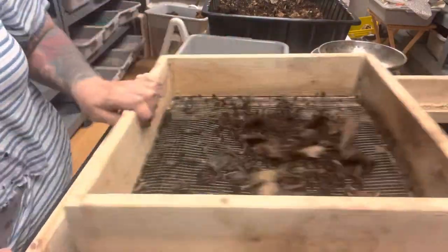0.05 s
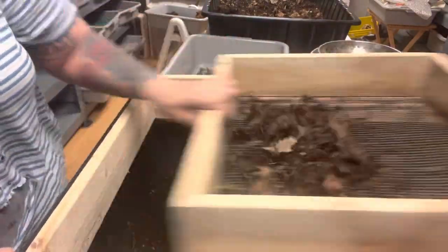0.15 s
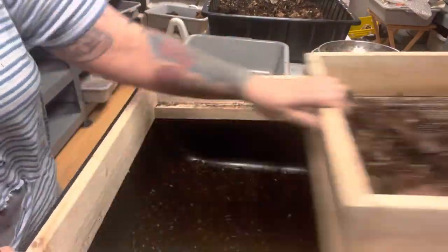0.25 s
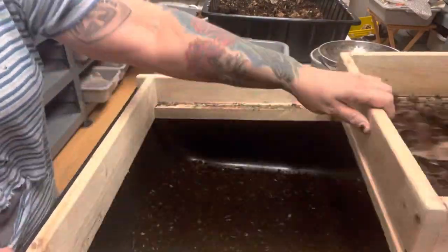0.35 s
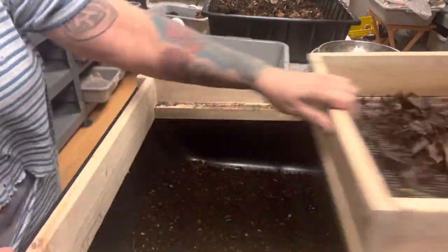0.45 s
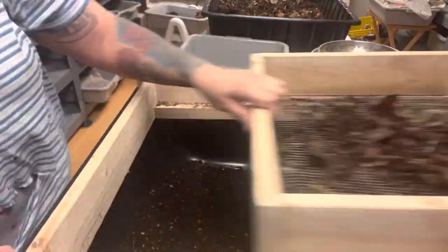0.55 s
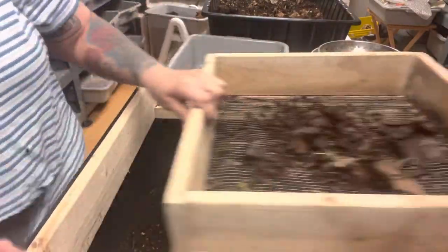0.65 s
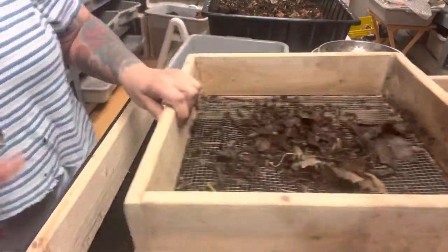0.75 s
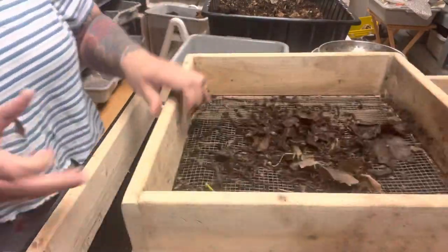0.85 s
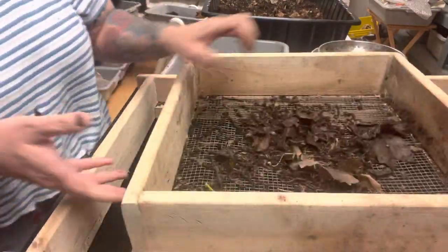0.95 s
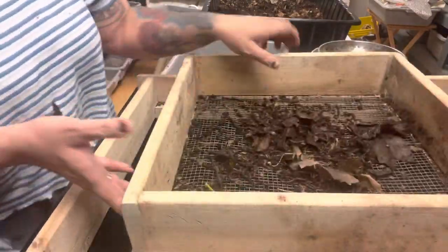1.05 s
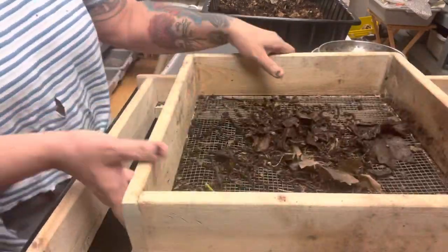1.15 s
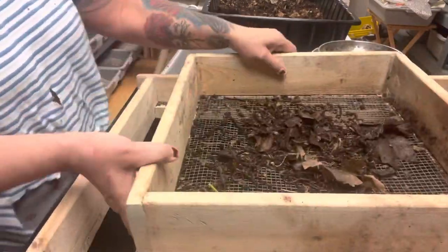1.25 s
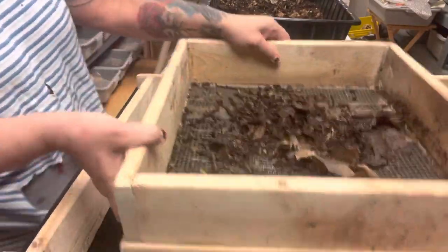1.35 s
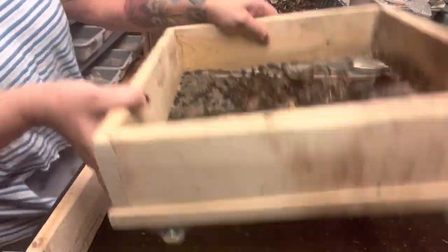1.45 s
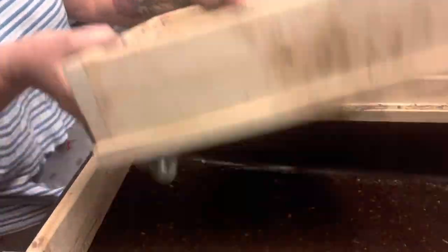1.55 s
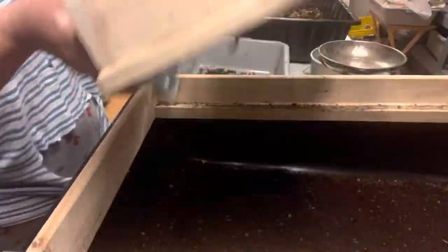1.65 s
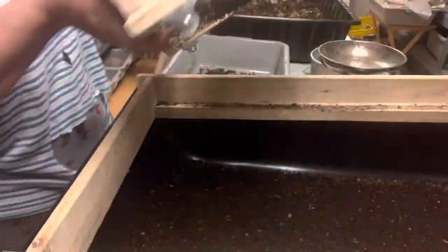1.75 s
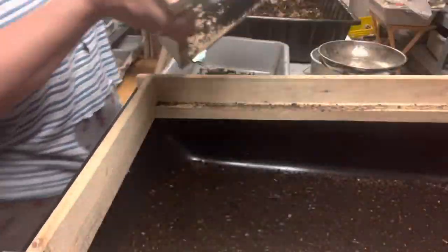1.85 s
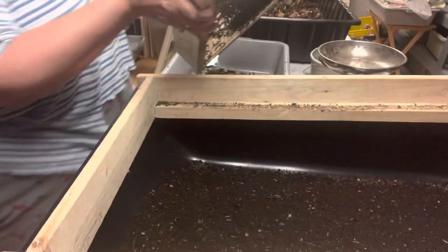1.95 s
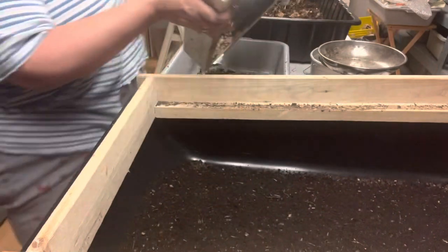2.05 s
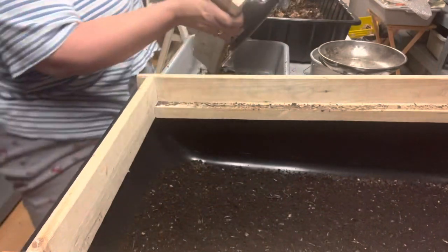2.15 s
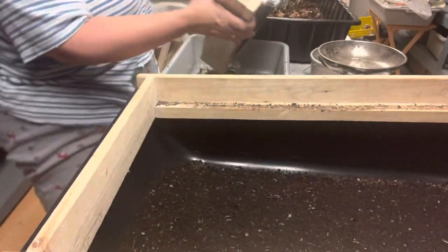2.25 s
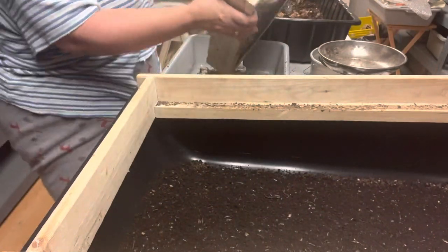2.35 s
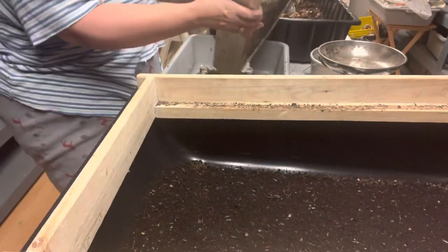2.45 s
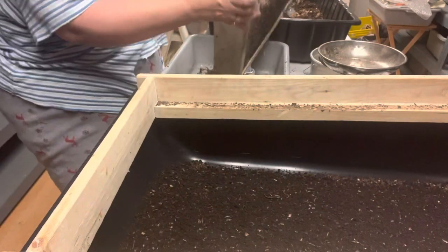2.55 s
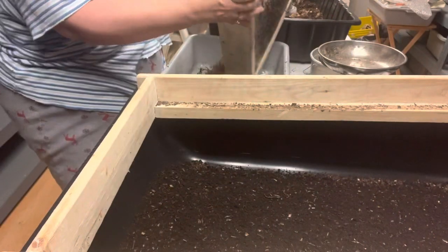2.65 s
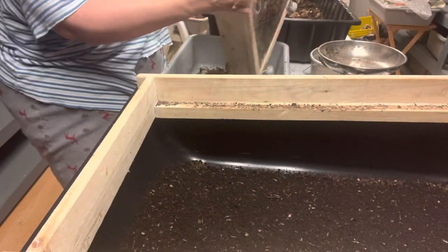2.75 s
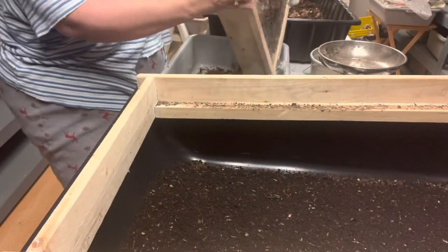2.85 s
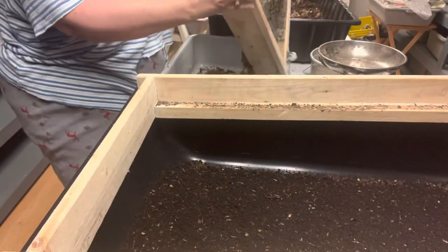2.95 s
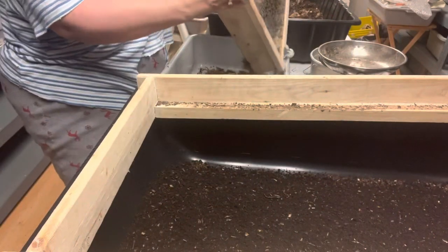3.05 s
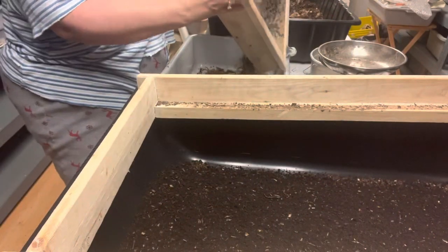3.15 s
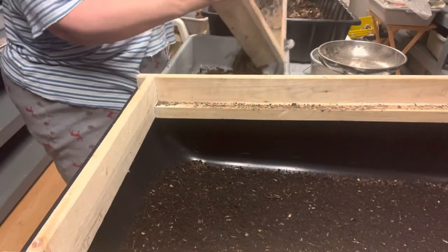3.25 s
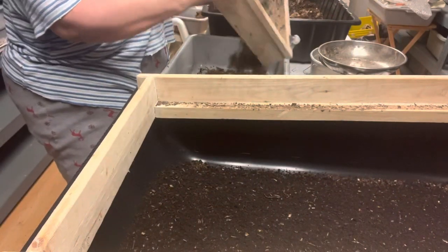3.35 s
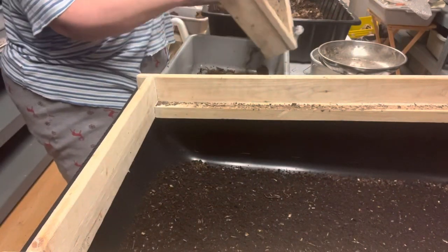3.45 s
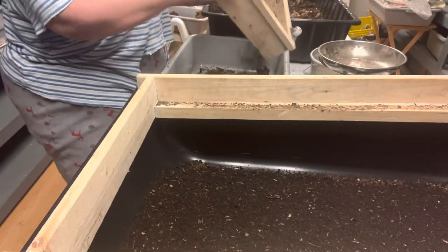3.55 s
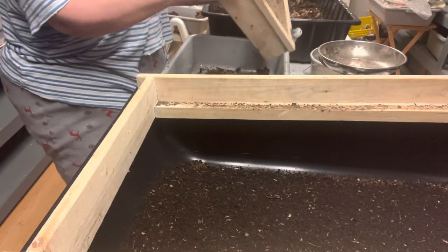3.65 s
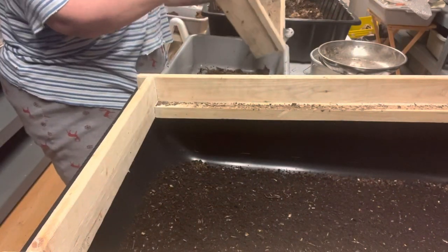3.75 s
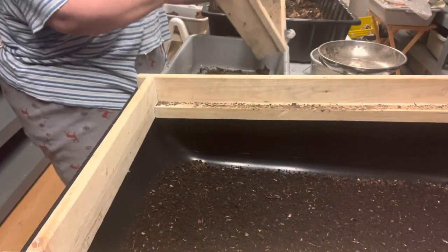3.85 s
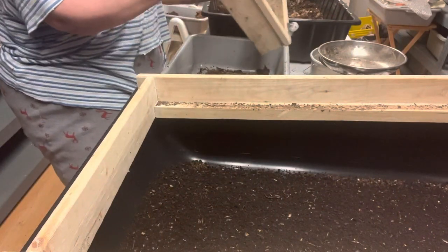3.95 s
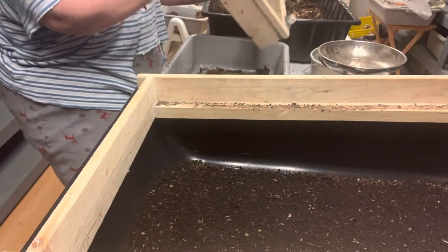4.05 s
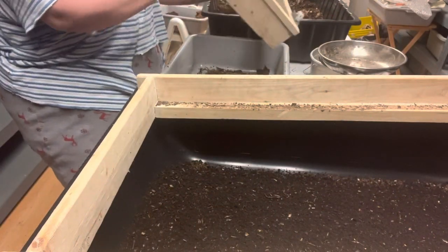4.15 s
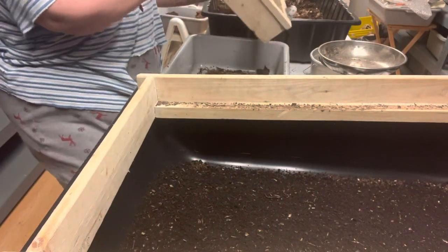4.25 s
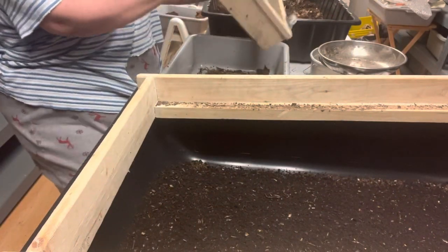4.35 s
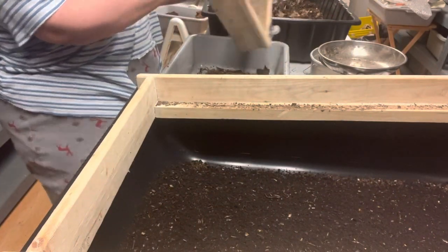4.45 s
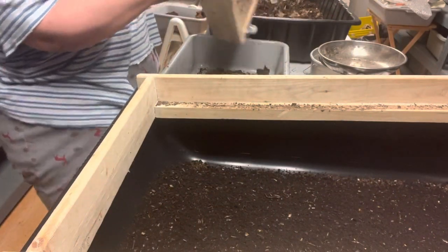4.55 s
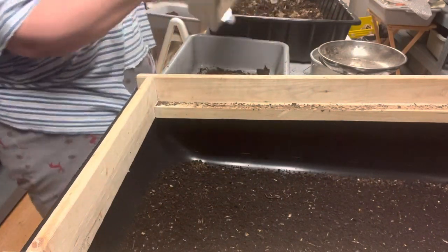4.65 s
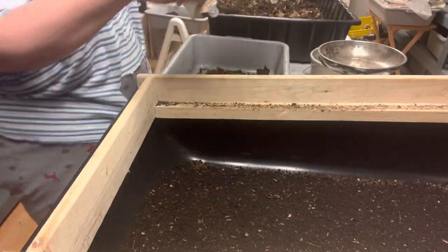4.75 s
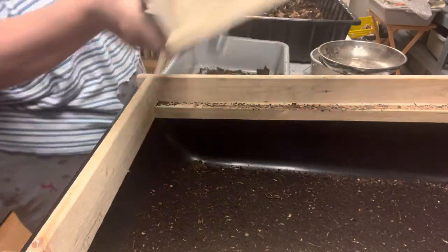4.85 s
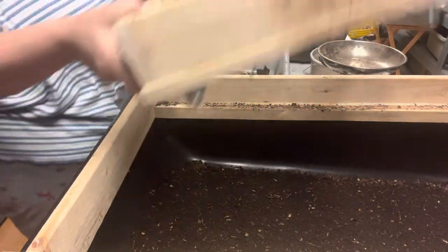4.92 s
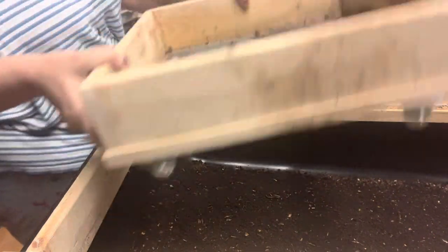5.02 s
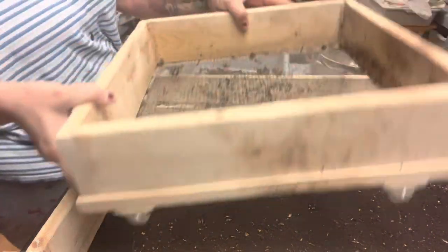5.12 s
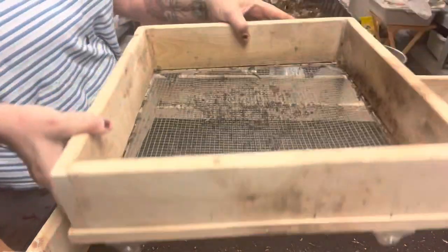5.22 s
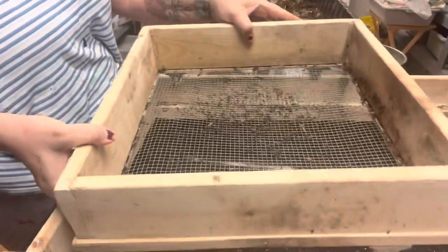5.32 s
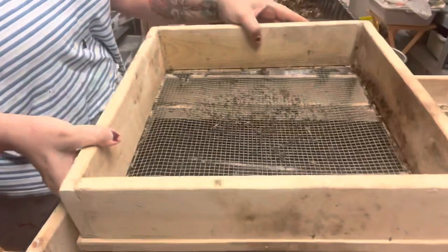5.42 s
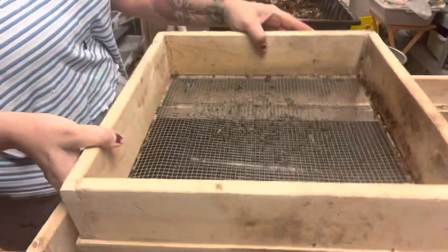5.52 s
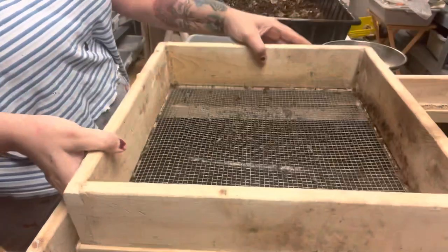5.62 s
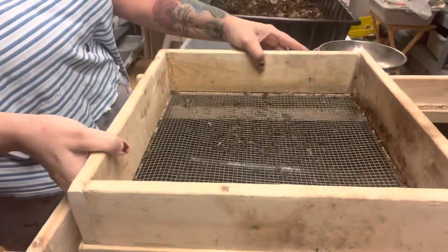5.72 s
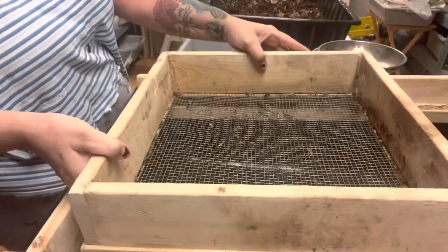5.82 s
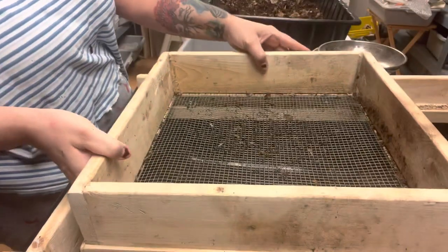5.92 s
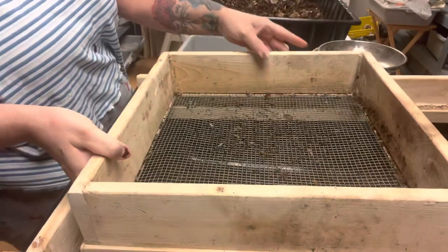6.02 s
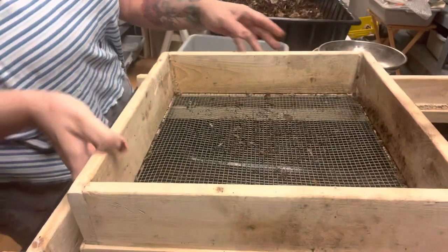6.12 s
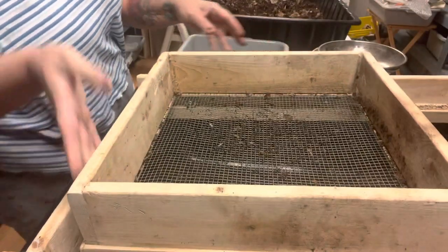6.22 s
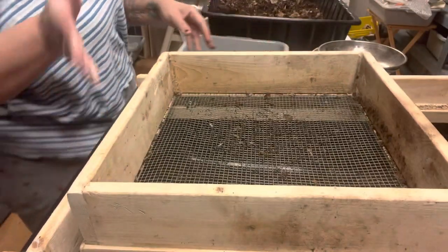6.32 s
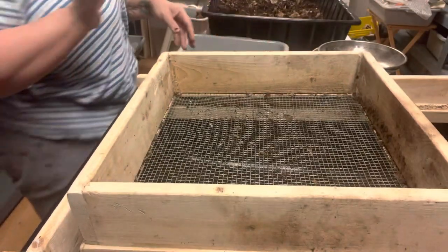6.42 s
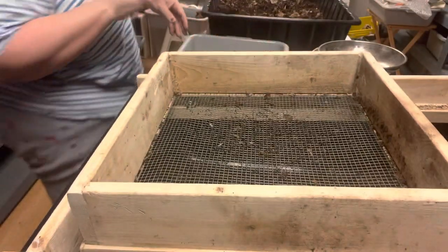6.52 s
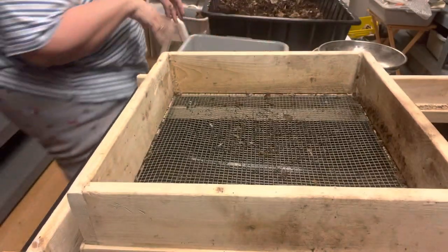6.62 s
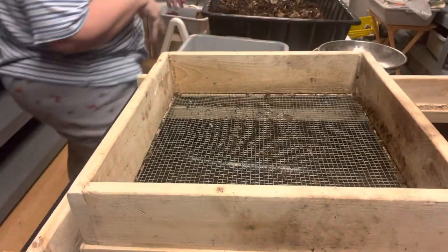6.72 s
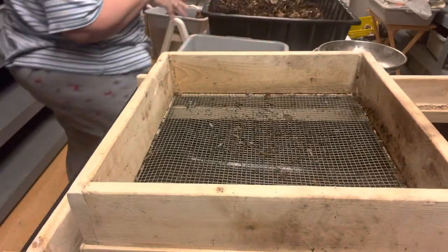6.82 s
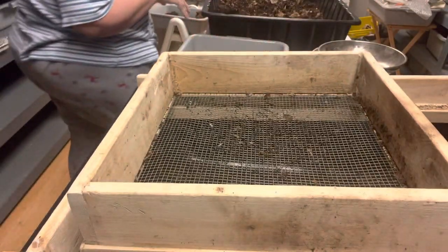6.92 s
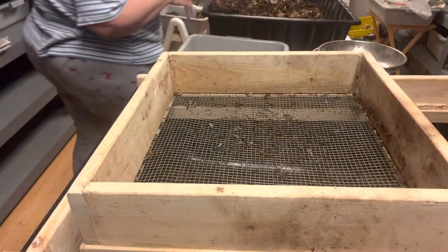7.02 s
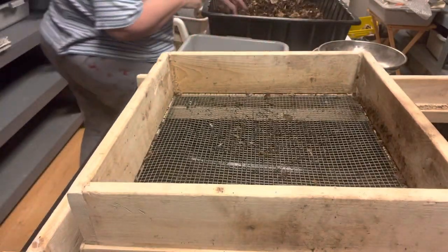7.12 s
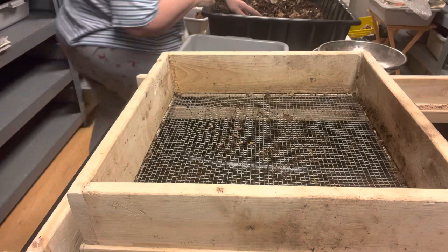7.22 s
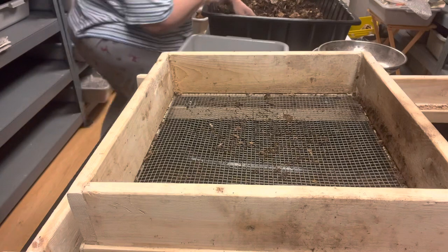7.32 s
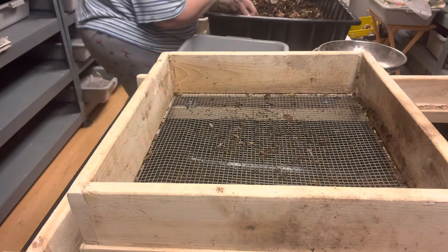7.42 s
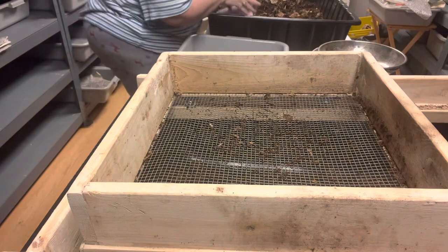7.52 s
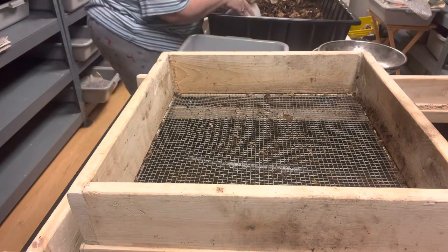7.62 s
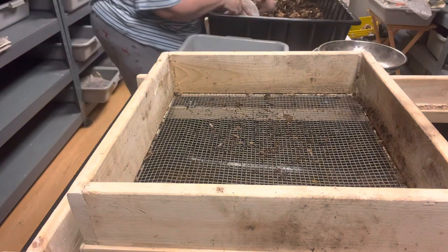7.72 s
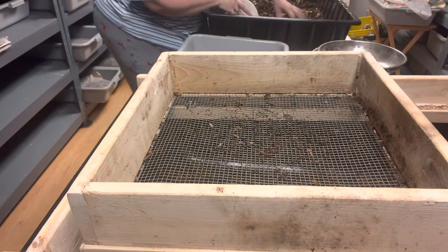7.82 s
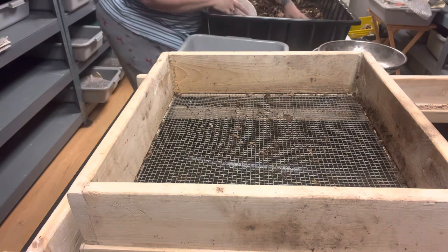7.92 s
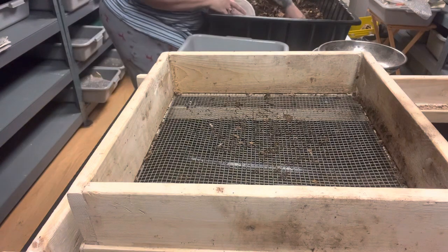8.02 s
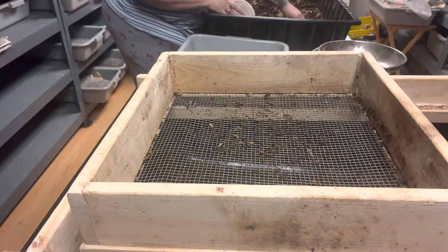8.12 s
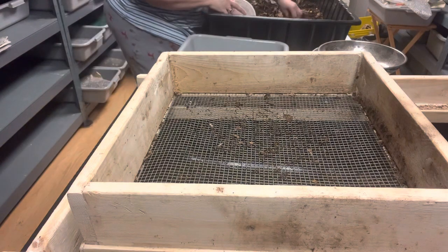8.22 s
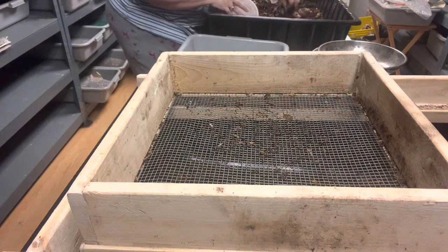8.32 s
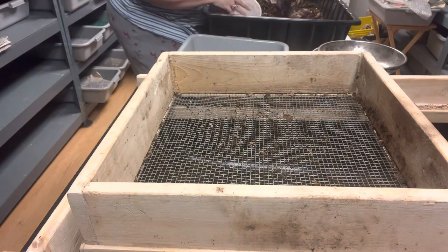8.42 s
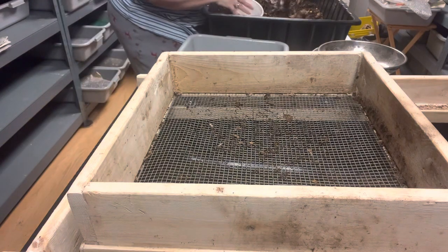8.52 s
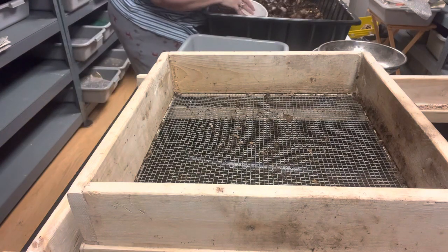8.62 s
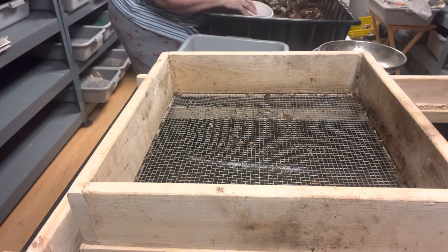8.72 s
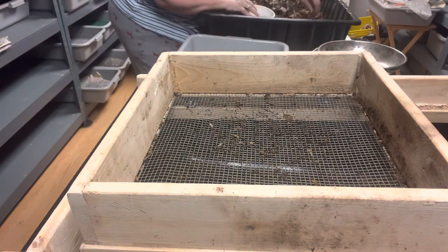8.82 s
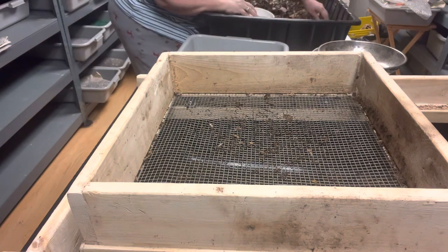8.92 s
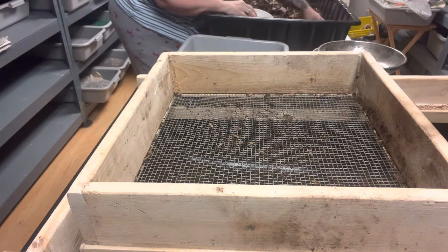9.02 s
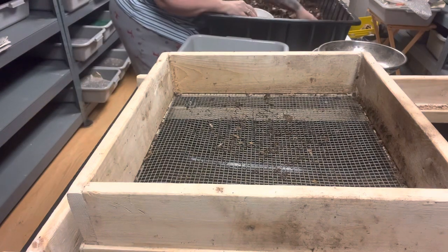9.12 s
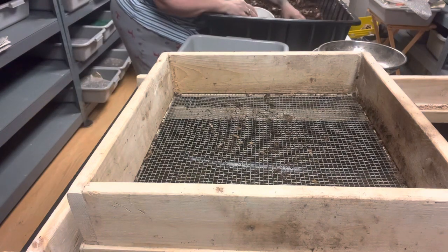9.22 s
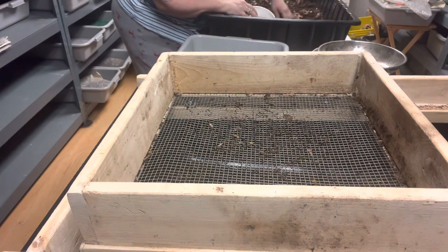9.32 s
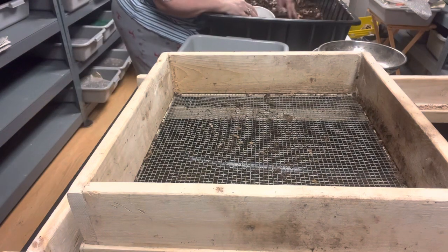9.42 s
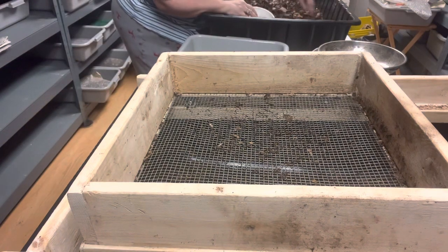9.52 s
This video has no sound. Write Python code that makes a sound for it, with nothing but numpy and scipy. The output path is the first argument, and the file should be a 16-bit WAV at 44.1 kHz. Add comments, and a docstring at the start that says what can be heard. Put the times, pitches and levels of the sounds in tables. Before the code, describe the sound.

Caster rumble and metallic clacks, light rattling shakes and sliding compost, two loud wood-and-steel landings, then quiet rummaging a few steps away.

```python
"""Casters rumble and clack along the rails of a tub in a small workroom, under a wooden sifter with a wire mesh.
The sifter is lifted, tipped over a bin and shaken: it rattles while compost slides off, then lands with two hard
clacks. Afterwards hands rummage in compost and bump a plastic bin a few steps away. Blows are noise or sine modes
that decay exponentially; rolling and compost are random trains of tiny contacts, coloured by resonances."""
import sys
import numpy as np
from scipy import signal
from scipy.fft import rfft, irfft, next_fast_len
from scipy.io import wavfile
from scipy.ndimage import map_coordinates

SR = 44100
rng = np.random.default_rng(int(sys.argv[2]) if len(sys.argv) > 2 else 0)


def unload_wav(signal):
    """Save mono or channel-first audio to the path in sys.argv[1] as 16-bit WAV at rate SR, clipped to [-1, 1]."""
    wavfile.write(
        sys.argv[1],
        SR,
        np.round(np.clip(np.atleast_2d(signal).T, -1, 1) * 32767).astype(np.int16),
    )


N = 422037
TAIL = np.arange(SR * 2 // 5) / SR  # time axis of one decaying blow, in seconds

# Levels in the tables are in dB before the trim and balance of each layer.
# Speed of the sifter pushed away and pulled back, as the level of its rumble: time_s, level_db
PUSH = [(0.0, -26), (0.048, -31), (0.152, -18), (0.284, -22.5), (0.364, -40), (0.404, -30.5), (0.53, -20.5),
        (0.698, -31), (0.826, -63.5), (0.85, -48.5)]
FULL_SPEED_DB = -19.5  # rumble level that counts as full speed
# Shakes over the bin, about six a second: time_s, clatter_db, brightest_hz, backswing_lead_s, backswing_db
SHAKE_STROKES = [(3.477, -39.5, 900, 0.043, -42.5), (3.644, -39.5, 960, 0.037, -47.5),
                 (3.804, -37.5, 900, 0.0089, -58), (3.958, -34.5, 1100, 0.028, -46.5),
                 (4.121, -36, 945, .049, -39.5), (4.308, -41, 2000, 0.064, -41.5)]
# Scraps and edges ticking as the sifter is gripped, tipped and settles: time_s, clatter_db, brightest_hz
TICKS = [(1.252, -44, 2590), (1.288, -39.5, 2320), (1.833, -41.5, 1140), (1.969, -48, 2170),
         (2.145, -48, 2370), (2.447, -44.5, 2560), (2.486, -48.5, 1300), (2.526, -57.5, 1180),
         (2.601, -57.5, 680), (2.633, -59.5, 2700), (2.676, -50.5, 1510), (2.723, -50.5, 950),
         (2.761, -52, 2260), (2.801, -44.5, 2540), (2.901, -46, 2400), (3.056, -49.5, 2310),
         (3.108, -61, 1240), (3.208, -55.5, 587), (3.244, -58, 2480), (3.302, -53, 1060), (3.387, -50, 900),
         (3.568, -46.5, 2410), (4.044, -45.5, 2700), (4.172, -42.5, 2660), (4.214, -46.5, 2100),
         (4.859, -52.5, 1950), (5.796, -47, 2100), (5.837, -53, 2450), (5.924, -61, 1900)]
BACKSWING_HZ = 2660  # modes favoured by the lighter contacts
# How much earlier sound reaches the left side as the sifter is moved about: time_s, lead_ms
SIFTER_LEAD = [(0, -.18), (.7, -.18), (1.3, .32), (5.2, .32), (5.6, .22)]
BIN_LEAD_MS = 0.043  # the same for sounds from above the bin
# Likeness of the left and right signals: frequency_hz, correlation
ALIKE = [(100, 0.96), (200, 0.97), (370, 0.25), (700, 0.13), (1300, 0.48), (2400, -0.27), (4500, 0.17),
         (14000, -0.3)]
# Resonances of the frame on the tub: frequency_hz, width_hz, level_db
FRAME = [(81, 7.7, -2), (115, 16, -5.5), (167, 7, -12.5), (170, 26, 0), (236, 34, -5), (394, 46, -6),
         (467, 15, -2.5), (511, 18, -0.5), (671, 20, -5), (655, 12, -5), (775, 40, -2.5), (848, 5.7, -6.5),
         (1057, 100, -7.5), (954, 29, -8), (1146, 50, -7.5), (1290, 31, -11)]
# Resonances of the steel casters: frequency_hz, width_hz, level_db
CASTER = [(1916, 65, 7), (2380, 14, 9.5), (2530, 27, -3), (2800, 53, -1), (3270, 25, -8.5),
          (3530, 220, -3.5), (3760, 92, -12), (4220, 17, -12), (4080, 21, -8), (5100, 33, -13),
          (5450, 46, -8.5), (6060, 200, -11.5), (6840, 150, -4.5), (8140, 62, -1)]
# Resonances of the mesh and its fixings: frequency_hz, width_hz, level_db
WIRES = [(486, 34, -6), (680, 25, -8.5), (966, 78, -10), (1182, 27, 4), (1308, 110, -3), (2440, 40, -21),
         (3010, 24, -22.5), (3200, 64, -11.5), (4300, 40, -17), (4710, 32, -20.5), (5000, 19, -1.5),
         (6030, 53, -25.5)]
# Spectral density of the frame's rumble and thud: frequency_hz, level_db
RUMBLE = [(20, -30.5), (50, -8.5), (66, -10.5), (85, -3.5), (120, -2), (172, -2), (240, -9.5), (330, -11),
          (500, -31), (1000, -70)]
# Spectral density of wheel grind and wooden raps: frequency_hz, level_db
GRIND = [(150, -31.5), (300, 0.5), (450, 0), (700, -2), (1150, -5), (1500, -8), (2200, -12.5), (5000, -54)]
# Spectral density of bearings and cracking steel: frequency_hz, level_db
STEEL = [(300, -29.5), (900, -5.5), (1600, -2), (2500, -3), (3600, -2), (5200, -3.5), (7000, -9),
         (7900, -14), (8800, -21.5), (10500, -16.5), (13500, -20), (15000, -35)]
# Spectral density of the clattering mesh: frequency_hz, level_db
CLATTER = [(190, -72), (330, -29), (484, -2.5), (757, -6), (957, -0.5), (1060, -8), (1150, -7), (1360, -1),
           (1450, -18), (1580, -14.5), (1830, -2), (2490, -1), (2690, 0), (3820, -5), (4200, 0),
           (5460, -43.5), (9240, -120)]
# Spectral density of scuffs and the loose caster: frequency_hz, level_db
SCUFF = [(600, -8), (1300, 1), (2500, -1), (4000, -12), (9000, -30)]
# Spectral density of hopping debris and caster clicks: frequency_hz, level_db
DEBRIS = [(500, -14.5), (1200, 3.5), (3000, 4.5), (5500, 0), (7500, -19.5), (13000, -25.5)]


def amp(db):
    """Decibels to amplitude gain: 20 dB is a factor of ten."""
    return 10 ** (np.asarray(db) / 20)


def tilt(left_db):
    """Stereo balance: gain the left by some decibels and the right by their opposite."""
    return amp([[left_db], [-left_db]])


def unit(x):
    """Normalisation of signal power: scale to rms 1."""
    return x / np.sqrt(np.mean(x ** 2) + 1e-20)


def along(points, hz):
    """Logarithmic frequency axis: interpolate (Hz, value) points on it."""
    f, v = np.transpose(points)
    return np.interp(np.log(hz + 1), np.log(f), v)


def gains(rows):
    """Amplitude envelope: one gain per sample along a (s, dB) curve, fading out just beyond its end."""
    s, db = np.transpose(rows)
    t = np.arange(N) / SR
    ending = np.interp(t, [s[-1], s[-1] + .02], [1, 0])
    return ending * amp(np.interp(t, s, db))


def swells(rows, rise_share, t60):
    """Power summation of movements that rise, hold and decay: one gain curve per dB column after start, length."""
    power = np.zeros((len(rows[0]) - 2, N))
    for s, length, *db in rows:
        t = np.arange(int((length + t60) * SR)) / SR
        rise = np.minimum(t / (rise_share * length), 1)
        envelope = rise * amp(-60 * np.maximum(t - length, 0) / t60)
        add(power, s, (amp(db)[:, None] * envelope) ** 2)
    return np.sqrt(power)


def surges():
    """Random modulation: uneven clumps make the gain wander about 1 within a fixed swing."""
    swing_db, swings_per_s = 2.5, 12
    knots = np.arange(N) * swings_per_s / SR
    return amp(swing_db * np.interp(knots, np.arange(1000), rng.uniform(-1, 1, 1000)))


def add(track, s, sound):
    """Superposition: mix a sound in at time s."""
    start = max(0, round(s * SR))
    track[:, start:start + sound.shape[1]] += sound[:, :N - start]


def body(resonances, between):
    """Resonant response: peaks standing out of a floor of many weaker modes."""
    def response(hz):
        peaks = sum(amp(2 * db) / (1 + (2 * (hz - f) / width) ** 2) ** 2 for f, width, db in resonances)
        return between + np.sqrt(peaks)
    return response


def uneven(shape, ripple_db, spacing_hz):
    """Modal excitation: every contact drives neighbouring modes at different strengths."""
    strengths = np.clip(rng.standard_normal(600), -1.6, 1.6)
    return lambda hz: shape(hz) * amp(ripple_db * map_coordinates(strengths, [hz / spacing_hz], mode="mirror"))


def favour(shape, centre_hz, lift_db, octaves, ripple_db, spacing_hz):
    """Modal participation: the place of a blow favours the modes around one frequency."""
    struck = uneven(shape, ripple_db, spacing_hz)
    return lambda hz: struck(hz) * amp(lift_db * np.exp(-(np.log2((hz + 1) / centre_hz) / octaves) ** 2))


def colour(pair, spectrum, shape=lambda hz: 1):
    """Interaural correlation: two unrelated signals become coloured stereo of rms 1, alike in the bass."""
    n = pair.shape[1]
    m = next_fast_len(n + 4096)
    hz = np.fft.rfftfreq(m, 1 / SR)
    turn = np.arccos(np.clip(along(ALIKE, hz), -1, 1)) / 2
    filtered = rfft(pair, m) * amp(along(spectrum, hz)) * shape(hz)
    mid, side = irfft(filtered * [np.cos(turn), np.sin(turn)], m)[:, :n]
    return unit(np.array([mid + side, mid - side]))


def placed(pair, lead_ms, direct):
    """Time-of-arrival difference: the direct share reaches one side first; the rest stays diffuse."""
    n = pair.shape[1]
    m = next_fast_len(n + 256)
    left, right = rfft(pair, m)
    share = np.clip(direct, 0, .9)
    # half the lead advances the left, half delays the right
    early = np.exp(1j * np.pi * np.fft.rfftfreq(m, 1 / SR) * lead_ms / 1000)
    mid = (left + right) / 2 * np.sqrt(1 + share)
    side = (left - right) / 2 * np.sqrt(1 - share)
    return irfft(np.array([(mid + side) * early, (mid - side) / early]), m)[:, :n]


def burst(spectrum, t60, attack, shape=lambda hz: 1):
    """High modal density: a crowd of close modes, struck together, decays like coloured noise."""
    fade = amp(-60 * TAIL / t60) * (1 - np.exp(-TAIL / attack))
    sound = colour(rng.standard_normal((2, len(TAIL))), spectrum, shape) * fade
    return unit(sound) * np.sqrt(np.mean(fade ** 2))


def flurry(spectrum, delays, levels_db, t60, shape):
    """Energy summation: several quick contacts on one body, each dying away."""
    age = TAIL - np.asarray(delays)[:, None]
    energy = (age >= 0) * amp(2 * (np.asarray(levels_db)[:, None] - 60 * np.maximum(age, 0) / t60))
    fade = np.sqrt(energy.sum(axis=0))
    sound = colour(rng.standard_normal((2, len(TAIL))), spectrum, shape) * fade
    return unit(sound) * np.sqrt(np.mean(fade ** 2))


def ring(modes, scatter_db):
    """Free modal vibration: damped sines at new strengths for each blow, high ones out of step left to right."""
    hz, db, t60 = np.transpose(modes)[:, :, None]
    size = amp(db + scatter_db * rng.standard_normal(hz.shape))
    phase = 2 * np.pi * (hz * TAIL + rng.random(hz.shape))
    skew = np.arccos(np.clip(along(ALIKE, hz), -1, 1)) / 2 * rng.choice([-1, 1], hz.shape)
    decay = amp(-60 * TAIL / t60) * (1 - np.exp(-TAIL / 0.0029))
    fade = size / np.linalg.norm(size) * decay
    return np.array([(fade * np.sin(phase + side * skew)).sum(0) for side in (1, -1)])


def grains(rate, spread_db, life):
    """Shot noise: tiny contacts at random times and of random size, each a short puff."""
    sizes = amp(spread_db * np.clip(rng.standard_normal(N), -2, 2))
    kicks = (rng.random(N) < rate / SR) * sizes
    energy = signal.lfilter([1], [1, -np.exp(-2 / (life * SR))], kicks ** 2)
    return unit(np.sqrt(energy) * rng.standard_normal((2, N)))


def wheels(spectrum, shape, rate, life, spacing_hz, count):
    """Independent excitation: each wheel meets its own grit and modes, so the colour keeps shifting."""
    voices = [uneven(shape, ripple_db=7.5, spacing_hz=spacing_hz) for _ in range(count)]
    return unit(sum(colour(grains(rate / count, spread_db=4, life=life), spectrum, voice) for voice in voices))


def room(x):
    """Reverberation: the workroom's diffuse answer, each frequency decaying at its own speed."""
    # frequency_hz, t60_s
    decay_times = [(100, 0.29), (400, 0.22), (1200, 0.23), (4000, 0.16), (12000, 0.022)]
    noise = colour(rng.standard_normal((2, len(TAIL))), [(20, 0), (20000, 0)])
    hz, t, z = signal.stft(noise, SR, nperseg=256)
    decay = amp(-60 * t / along(decay_times, hz)[:, None])
    tail = signal.istft(z * decay, SR, nperseg=256)[1]
    tail = np.pad(tail, ((0, 0), (SR // 150, 0)))  # the answer starts a moment late
    return signal.fftconvolve(x, tail / np.linalg.norm(tail[0]), axes=1)[:, :N]  # left tail has unit energy


def air():
    """Stationary noise: a steady, faint, coloured background."""
    # spectral density: frequency_hz, level_db
    air_colour = [(15, -34), (25, 0.5), (71, -3), (389, -10), (778, -16), (1020, -22), (4400, -16.5),
                  (10600, -25), (13100, -21.5), (14600, -28.5)]
    return amp(-72) * colour(rng.standard_normal((2, N)), air_colour)


def clothes():
    """Friction noise: clothes and shoes brush softly as someone turns away to the bins."""
    # start_s, length_s, level_db
    brushes = [(6.35, 0.16, -60.5), (6.64, 0.051, -66.5), (6.92, 0.065, -60), (7.04, 0.072, -59),
               (7.21, 0.12, -59.5), (7.53, 0.16, -60.5)]
    # spectral density: frequency_hz, level_db
    cloth = [(100, -14), (220, -8.5), (340, -3.5), (480, -8.5), (680, -7), (1000, -19.5), (2500, -18.5),
             (6000, -34)]
    brushing = swells(brushes, rise_share=0.18, t60=0.31) * surges()
    return brushing * colour(grains(rate=73, spread_db=-4.0, life=0.03), cloth)


def bumps():
    """Cavity and wall resonance: dull contacts with plastic bins, the boom's pitch set by the wall hit."""
    # time_s, tap_db, boom_db, scuff_db, boom_hz
    bump_rows = [(1.783, -41, -53, -53, 450), (1.838, -46, -51.5, -46, 497), (3.3, -54.5, -53.5, -52, 162),
                 (4.476, -43.5, -46.5, -56.5, 296), (6.354, -63, -56.5, -80, 474),
                 (7.627, -53.5, -62, -52.5, 261), (7.701, -63, -90, -48, 250),
                 (8.926, -48.5, -44.5, -68, 283), (8.95, -45.5, -46, -54.5, 183),
                 (9.039, -84, -76, -52, 202.5)]
    # spectral densities of the tap and the hollow boom: frequency_hz, level_db
    tap = [(200, -18), (380, 4), (650, 3), (1000, -10), (1500, -23), (3000, -29)]
    boom = [(50, -28), (110, -8), (170, -1), (280, -1), (400, -11), (650, -13), (1200, -40.5)]
    out = np.zeros((2, N))
    for s, tap_db, boom_db, scuff_db, boom_hz in bump_rows:
        wall = favour(np.ones_like, boom_hz, lift_db=15.0, octaves=0.3, ripple_db=6.0, spacing_hz=44.5)
        add(out, s, amp(tap_db) * burst(tap, t60=0.14, attack=0.0002))
        add(out, s, amp(boom_db + 5.5) * burst(boom, t60=0.13, attack=0.0027, shape=wall))
        add(out, s, amp(scuff_db + 0.5) * burst(SCUFF, t60=0.15, attack=0.00094))
    return out


def compost():
    """Granular flow: clods shuffle over the wires and fine crumbs patter; later, hands stir the bin."""
    # compost sliding over the mesh: start_s, length_s, clods_db, crumbs_db
    slides = [(0.98, 0.11, -64, -75.5), (1.09, 0.11, -64.5, -71), (1.61, 0.22, -62.5, -72),
              (1.88, 0.16, -58.5, -71), (2.06, 0.11, -51, -57.5), (2.2, 0.19, -50, -61.5),
              (2.42, 0.15, -70, -70.5), (2.57, 0.45, -73.5, -72.5), (2.88, 0.47, -70, -71),
              (3.37, 0.032, -57, -58), (3.5, 0.84, -65.5, -87), (4.38, 0.0068, -87, -69),
              (4.49, 0.027, -61, -63.5), (4.54, 0.16, -59.5, -70.5), (4.88, 0.18, -69, -76),
              (5.91, 0.033, -70, -78), (6.04, 0.09, -68, -69.5)]
    # hands stirring the compost in the bin: start_s, length_s, clods_db, crumbs_db
    stirs = [(6.42, .45, -81.5, -85.5), (6.58, 0.12, -68, -81.5), (6.94, 0.078, -54.5, -64),
             (7.03, 0.18, -67.5, -79.5), (7.3, 0.1, -69.5, -70.5), (7.48, 0.076, -63, -68.5),
             (7.56, 0.1, -57.5, -68), (7.8, 0.035, -60, -66), (7.87, 0.2, -60.5, -69),
             (7.99, 0.096, -54.5, -59.5), (8.1, .17, -64, -64), (8.27, 0.22, -62.5, -61),
             (8.46, 0.098, -70, -67.5), (8.6, 0.22, -78, -78), (9.0, 0.071, -65.5, -65.5),
             (9.08, 0.2, -70.5, -67), (9.3, 0.081, -83.5, -73), (9.41, 0.049, -98, -80)]
    # spectral densities of clods and of crumbs: frequency_hz, level_db
    shuffle = [(100, -24.5), (250, -9.5), (380, -0.5), (750, -4.5), (1250, -2.5), (2200, 1), (4000, -5),
               (9000, -31.5)]
    crumb_colour = [(880, -33.5), (1500, -19), (1900, -9), (2530, -5), (6560, -1.5), (9600, -6),
                    (13300, -4), (14600, -10)]
    # flow gathers speed over this share of a movement, then trickles out
    flow_rise_share, slide_t60_s, stir_t60_s = 0.55, 0.24, 0.33
    # each shake or tick spills some, relative to its clatter column
    spill_s, spill_clods_db, spill_crumbs_db = 0.0098, -22, -28.5
    spills = [(s, spill_s, db + spill_clods_db, db + spill_crumbs_db) for s, db, *_ in SHAKE_STROKES + TICKS]
    slide_gains = swells(slides, flow_rise_share, slide_t60_s)
    sliding, falling = slide_gains + swells(spills, rise_share=0.96, t60=0.2)
    stirring, trickling = swells(stirs, flow_rise_share, stir_t60_s)
    on_mesh = colour(grains(rate=350, spread_db=1.0, life=0.015), shuffle, body(WIRES, between=0.81))
    in_bin = colour(grains(rate=350, spread_db=-9, life=0.044), shuffle)
    patter = colour(grains(rate=4100, spread_db=-1.0, life=.002), crumb_colour)
    clods = amp(3.5) * sliding * on_mesh + amp(-0.5) * stirring * in_bin
    return surges() * (clods + amp(10.0) * (falling + trickling) * patter)


def whirr():
    """Rolling-element noise: spinning ball races sing on through the turn between push and pull."""
    # time_s, level_db
    spin = [(0.08, -50), (0.17, -39), (0.28, -36.5), (0.36, -33.5), (0.54, -37), (0.68, -50), (0.76, -76)]
    # resonances: frequency_hz, width_hz, level_db
    race_modes = [(1284, 73, 4.5), (2070, 55, 1), (2980, 50, -3), (3330, 56, 4.5), (3610, 40, -2),
                  (4050, 50, -7), (4000, 47, -5.5), (4200, 41, -7), (5400, 100, -2.5), (5560, 100, -11.5),
                  (5970, 110, -2)]
    # spectral density: frequency_hz, level_db
    whirr_colour = [(700, -24), (1200, -1), (3500, 6), (5950, -3), (6300, -17.5), (8000, -28.5),
                    (13000, -24.5)]
    races = colour(grains(rate=690, spread_db=-0.5, life=.006), whirr_colour, body(race_modes, between=0.24))
    return gains(spin) * placed(races, SIFTER_LEAD[0][1], direct=0.63)


def debris():
    """Impact noise growing with speed: twigs and dry clods tick on the mesh; fine compost hisses through."""
    # fine compost raining through the mesh: time_s, level_db
    sifted = [(0.0, -61), (0.1, -52), (0.33, -53.5), (0.45, -57), (0.62, -67), (0.74, -76)]
    # spectral density: frequency_hz, level_db
    sift_hiss = [(2000, -9), (6000, -3), (8300, -9.5), (10500, -1), (13300, 0), (14600, -9)]
    full_speed_ticks_db = -35
    force = gains(PUSH) / amp(FULL_SPEED_DB)
    ticks = colour(grains(rate=90, spread_db=3.5, life=.0018), DEBRIS)
    hiss = gains(sifted) * colour(rng.standard_normal((2, N)), sift_hiss)
    return amp(full_speed_ticks_db) * force * ticks + hiss


def pings():
    """Lightly damped resonance: a loose caster, with no weight on it, jingles as the frame is gripped."""
    # time_s, level_db
    ping_rows = [(1.256, -41), (1.291, -42.5), (1.301, -44)]
    # resonances: frequency_hz, width_hz, level_db
    ping_modes = [(1220, 24, -16), (1940, 29, -0.5), (2430, 25, -2), (2800, 40, 0), (3200, 36, 0),
                  (3644, 55, 6)]
    out = np.zeros((2, N))
    for s, db in ping_rows:
        add(out, s, amp(db) * burst(SCUFF, t60=0.09, attack=0.002, shape=body(ping_modes, between=0.3)))
        add(out, s, amp(db) * burst(DEBRIS, t60=0.02, attack=0.0005))  # click
    return out


def rattles(count=7):
    """Local modal excitation: crisp ticks favour parts of the mesh; stray scraps fall while it is tipped."""
    tipped_s, stray_db, stray_spread_db, dullest_hz = (1.9, 3.35), -59, 2, 820
    slots = np.linspace(*tipped_s, count + 1)
    strays = [(rng.uniform(a, b), rng.normal(stray_db, stray_spread_db), rng.uniform(dullest_hz, BACKSWING_HZ))
              for a, b in zip(slots, slots[1:])]
    out = np.zeros((2, N))
    for s, db, centre_hz in TICKS + strays:
        struck = favour(body(WIRES, between=.9), centre_hz,
                        lift_db=11, octaves=0.65, ripple_db=3, spacing_hz=170.0)
        delays = [0, rng.uniform(.003, .008)]
        add(out, s, amp(db - 0.5) * flurry(CLATTER, delays, [0, -3], t60=0.06, shape=struck))
    return placed(out, BIN_LEAD_MS, direct=.3)


def rolling():
    """Roughness excitation: grit on the rails makes the frame rumble, bearings chatter and compost jiggle."""
    # creeping on after each landing, and groaning as it is carried: start_s, length_s, rumble_db
    creeps = [(1.62, 0.28, -67.5), (5.27, .2, -42.5), (5.75, 0.011, -41), (5.84, 0.019, -47.5),
              (5.92, 0.059, -66.5)]
    grind_db, grind_growth = -22.5, 1.45  # level at full speed, and its dB per dB of speed
    # bearings and compost are thrown about for this long
    thrown_s, thrown_db, thrown_t60_s = 0.53, -43, 0.22
    faint_chatter_db = -20.5  # least chatter, relative to the speed curve
    speed = gains(PUSH) + swells(creeps, rise_share=0.14, t60=0.22)[0]
    grinding = amp(grind_db) * (speed / amp(FULL_SPEED_DB)) ** grind_growth
    thrown = amp(thrown_db - 60 * np.maximum(np.arange(N) / SR - thrown_s, 0) / thrown_t60_s)
    chatter = np.maximum(thrown, amp(faint_chatter_db) * speed)
    jolts = colour(grains(rate=900, spread_db=1.5, life=.012), RUMBLE, body(FRAME, between=.8))
    # the gripping hand damps the widest swings
    swing = np.abs(signal.hilbert(jolts, next_fast_len(N))[:, :N]).mean(axis=0)
    rumble = amp(0.3) * speed * unit(jolts / np.sqrt(1 + .4 * swing ** 2))
    grind = grinding * wheels(GRIND, body(FRAME, between=0.29), rate=450, life=0.0097, spacing_hz=69.7, count=3)
    bearings = wheels(STEEL, body(CASTER, between=0.35), rate=260, life=0.017, spacing_hz=167.0, count=2)
    jiggle = colour(grains(rate=240, spread_db=-3, life=0.0015), CLATTER, body(WIRES, between=0.076))
    loose = chatter * (amp(1.5) * bearings + amp(1) * jiggle)
    return rumble + placed(grind + loose, SIFTER_LEAD[0][1], direct=.3)


def knocks():
    """Impact response: the frame thuds on the rails, its sides ring by where they are hit, the mesh drums on."""
    # the frame jolting and landing: time_s, thud_db, rap_db, mesh_db, brightest_hz
    knock_rows = [(0.058, -38.5, -37.5, -50, 900), (0.118, -31.5, -26.5, -45.5, 800),
                  (0.152, -27, -25, -42, 780), (0.182, -25, -23, -42, 1000), (0.227, -29, -21, -41.5, 700),
                  (0.235, -23.5, -23, -42.5, 1050), (0.254, -27.5, -28, -46.5, 950),
                  (0.481, -36.5, -28, -44, 900), (0.511, -30.5, -32.5, -39, 500),
                  (0.609, -28.5, -44, -41, 700), (0.633, -20, -53, -46, 450), (0.667, -23.5, -32, -43, 450),
                  (0.686, -25, -32.5, -38, 500), (0.868, -39, -47, -76, 500), (0.966, -43, -58, -70, 450),
                  (1.117, -48.5, -53, -82, 550), (1.144, -40.5, -51, -44.5, 330),
                  (1.184, -51, -48.5, -53, 380), (1.275, -55.5, -67, -76, 450), (1.4, -43.5, -47, -33, 900),
                  (1.407, -41, -35, -27.5, 950), (1.463, -56, -64, -41.5, 300),
                  (5.185, -23, -17, -34.5, 1050), (5.191, -17.5, -17, -19.5, 400),
                  (5.248, -36.5, -37.5, -37, 360), (5.31, -45.5, -47, -44.5, 800),
                  (5.564, -19, -21.5, -29, 750), (5.598, -23, -36.5, -46.5, 450),
                  (5.625, -26.5, -34, -43.5, 420), (5.6747, -33, -24, -25.5, 415),
                  (5.691, -31.5, -28.5, -48, 660), (5.714, -23.5, -33, -34, 650),
                  (5.797, -66, -43.5, -68, 1100)]
    # ringing modes of the wooden sides: frequency_hz, level_db, t60_s
    plank_modes = [(330, -10.5, 0.18), (421, -1.5, 0.11), (503, -5, 0.15), (670, -10.5, 0.08),
                   (866, -12, 0.061), (998, -11, 0.069), (1043, -12.5, .082), (1167, -11, .1),
                   (1330, -12.5, 0.12)]
    # ringing modes of the stretched mesh: frequency_hz, level_db, t60_s
    mesh_modes = [(72, -14, .28), (96, -12, .7), (124, -19, .25), (178, -6, .2), (232, -2, .25),
                  (318, -6, .12), (445, -12, .09), (511, -14, .1), (713, -23, .14)]
    out = np.zeros((2, N))
    wood = body(FRAME, between=0.79)
    for s, thud_db, rap_db, mesh_db, centre_hz in knock_rows:
        side = favour(wood, centre_hz, lift_db=8, octaves=0.41, ripple_db=0.5, spacing_hz=40.8)
        place = favour(np.ones_like, centre_hz, lift_db=13.5, octaves=0.53, ripple_db=0.5, spacing_hz=39.7)
        modes = np.array(plank_modes)
        modes[:, 1] += 20 * np.log10(place(modes[:, 0]))
        add(out, s, amp(thud_db + 4.0) * burst(RUMBLE, t60=0.19, attack=0.0047, shape=wood))
        add(out, s, amp(rap_db - 0.5) * burst(GRIND, t60=0.1, attack=0.00055, shape=side))
        add(out, s, amp(rap_db + 3.5) * ring(modes, scatter_db=1.0))
        add(out, s, amp(mesh_db + 3.0) * ring(mesh_modes, scatter_db=1.0))
    return out


def clacks(count=5):
    """Repeated impact: a caster snaps against its bearing, then the loose steel bounces unevenly and rings."""
    # steel casters striking: time_s, crack_db, ring_db, brightest_hz
    clack_rows = [(0.02, -29, -49, 7950), (0.059, -23, -41.5, 4800), (0.117, -16, -27.5, 3900),
                  (0.141, -18.5, -30, 4873), (0.155, -19, -38, 8070), (0.181, -24, -32.5, 4440),
                  (0.208, -29, -34.5, 4210), (0.24, -28.5, -33, 4682), (0.25, -37.5, -39, 5980),
                  (0.259, -28, -31, 3480), (0.484, -23.5, -36, 3036), (0.506, -34, -39.5, 5000),
                  (0.518, -22.5, -40, 4670), (0.552, -22, -26, 4500), (0.565, -22.5, -46, 4610),
                  (0.607, -30, -41, 3760), (0.614, -25.5, -54, 5400), (0.653, -27.5, -51, 5340),
                  (0.687, -28, -46, 3730), (1.406, -34, -50, 2280), (5.1822, -7.5, -20.5, 5600),
                  (5.1872, -20.5, -24, 2400), (5.19, -11, -27.5, 5094), (5.473, -34, -41.5, 3475),
                  (5.495, -41, -45, 3450), (5.560, -6, -21.5, 4607), (5.581, -24.5, -23.5, 2995),
                  (5.586, -20, -27.5, 4264), (5.629, -41, -41, 2780), (5.691, -19, -33.5, 3450),
                  (5.707, -26, -43, 2680), (5.768, -47, -61, 7650)]
    # spectral density of the ringing steel: frequency_hz, level_db
    ring_colour = [(300, -28.5), (900, -3), (1600, -1), (2500, 1), (3600, -1), (5200, -7.5), (7000, -13),
                   (7900, -16), (8800, -24.5), (10500, -22), (13500, -24.5), (15000, -38.5)]
    # mean gap, first level relative to the ring column, and loss at each bounce
    bounce_s, bounce_db, bounce_loss_db = .013, -5, 5.5
    out = np.zeros((2, N))
    for s, crack_db, ring_db, centre_hz in clack_rows:
        steel = favour(body(CASTER, between=.7), centre_hz,
                       lift_db=9, octaves=0.55, ripple_db=1.5, spacing_hz=130)
        delays = np.cumsum(bounce_s * rng.uniform(.4, 1.6, count))
        levels = bounce_db - bounce_loss_db * np.arange(count) + rng.uniform(-3, 3, count)
        loose = uneven(body(CASTER, between=0.5), ripple_db=4, spacing_hz=293)
        crack = amp(crack_db + 2.0) * burst(STEEL, t60=.018, attack=0.00046, shape=steel)
        ringing = amp(ring_db - 1.0) * burst(ring_colour, t60=0.21, attack=0.00094, shape=steel)
        bounces = amp(ring_db) * flurry(ring_colour, delays, levels, t60=0.018, shape=loose)
        lead_ms = np.interp(s, *np.transpose(SIFTER_LEAD))
        add(out, s, placed(crack + ringing + bounces, lead_ms, direct=0.18))
    return out


def shudders(count=4, corners=3):
    """Dissipation through contact: corners settle separately after landing, in rough touches of wood and mesh."""
    # the two hard landings: time_s, clatter_db
    landings = [(5.196, -25.5), (5.574, -27.5)]
    # spectral density: frequency_hz, level_db
    shudder_colour = [(200, -16), (450, -0.5), (1250, 0.5), (1700, -6), (3300, -6), (6500, -12.5),
                      (8000, -24), (13000, -40)]
    gap_s, loss_db_per_s = .02, 230  # mean gap between a corner's contacts, and how fast they weaken
    out = np.zeros((2, N))
    for s, db in landings:
        for _ in range(corners):
            delays = np.cumsum(gap_s * rng.uniform(.5, 1.5, count)) - gap_s / 2
            levels = rng.uniform(-3, 3, count) - loss_db_per_s * delays
            shape = uneven(np.ones_like, ripple_db=5, spacing_hz=210)
            add(out, s, amp(db) * flurry(shudder_colour, delays, levels, t60=0.021, shape=shape))
    return placed(out, SIFTER_LEAD[-1][1], direct=.4)


def shake_contacts():
    """Elastic rebound: (s, clatter dB, relative zing dB, brightest Hz) of each backswing, stroke and rebound."""
    stroke_zing_db, backswing_zing_db, rebound_zing_db = 3, -1.5, -9.5
    rebound_s, rebound_db = 0.13, -25  # the mesh springs back after each stroke
    contacts = []
    for s, db, hz, lead_s, back_db in SHAKE_STROKES:
        contacts.append((s - lead_s, back_db, backswing_zing_db, BACKSWING_HZ))
        contacts.append((s, db, stroke_zing_db, hz))
        contacts.append((s + rebound_s, db + rebound_db, rebound_zing_db, BACKSWING_HZ))
    return contacts


def shakes(count=4):
    """Multiple impact: the mesh slaps the frame in a flurry of dry contacts while the wires zing."""
    # spectral density of the wires' zing: frequency_hz, level_db
    zing_colour = [(2500, -38), (4000, -6), (4750, 11.5), (5300, -2.5), (6000, -3.5), (7500, -22),
                   (10000, -20), (13500, -13), (15000, -24)]
    flurry_s, flurry_loss_db = 0.013, 5  # approximate time and loss from first to last contact
    flex_share = .035  # the mesh bellies differently at each contact, moving its resonances up to this share
    out = np.zeros((2, N))
    wires = body(WIRES, between=0.52)
    for s, clatter_db, zing_db, centre_hz in shake_contacts():
        steps = np.r_[0, np.arange(1, count) + rng.uniform(-.45, .45, count - 1)] / (count - 1)
        delays, levels = flurry_s * steps, -flurry_loss_db * steps
        flex = 1 + rng.uniform(-flex_share, flex_share)
        struck = favour(lambda hz: wires(hz / flex), centre_hz,
                        lift_db=3.0, octaves=0.48, ripple_db=1.5, spacing_hz=187.0)
        flexed_zing = np.multiply(zing_colour, [flex, 1])
        clatter = flurry(CLATTER, delays, levels, t60=0.069, shape=struck)
        zing = flurry(flexed_zing, delays, levels, t60=0.061, shape=struck)
        add(out, s, amp(clatter_db - 2.5) * (clatter + amp(zing_db) * zing))
    return placed(out, BIN_LEAD_MS, direct=0.42)


def scene():
    """Direct-to-reverberant ratio: the tub is close and dry; the bins lie farther off in the room's echo."""
    frame = (rolling() + knocks()) * tilt(-.5)
    steel_and_scraps = (clacks() + shudders() + pings() + whirr() + debris()) * tilt(1.2)
    near = frame + steel_and_scraps
    far = (shakes() + rattles()) * tilt(.8) + bumps()
    echo = room(amp(-18.0) * near + amp(-6.5) * far)
    return near + far + compost() * tilt(.3) + clothes() + air() + echo


def record(dry):
    """Band limiting and soft saturation: shed the deepest bass, round the highest peaks, cut the top treble."""
    peak_top, top_hz = .85, 14500  # ceiling before the treble cut, and the cutoff
    dry = signal.sosfilt(signal.butter(2, 42, "highpass", fs=SR, output="sos"), dry)
    dry = dry / (1 + np.abs(dry / peak_top) ** 8) ** (1 / 8)
    m = next_fast_len(N + SR)
    hz = np.fft.rfftfreq(m, 1 / SR)
    return irfft(rfft(dry, m) / np.sqrt(1 + (hz / top_hz) ** 120), m)[:, :N]


dry = scene()
out = record(dry)
unload_wav(out)
```